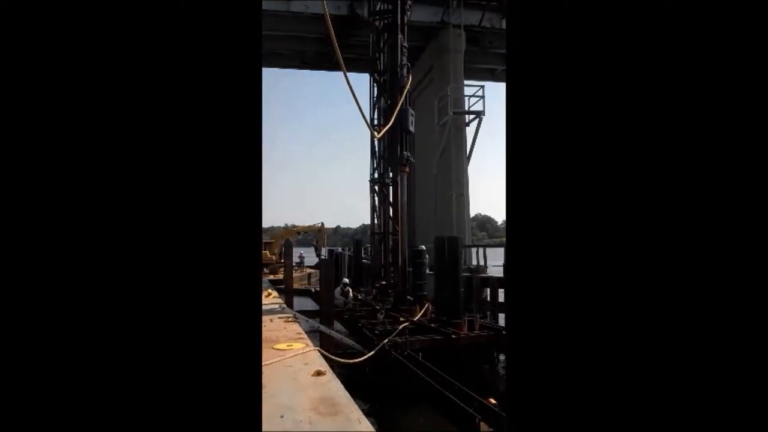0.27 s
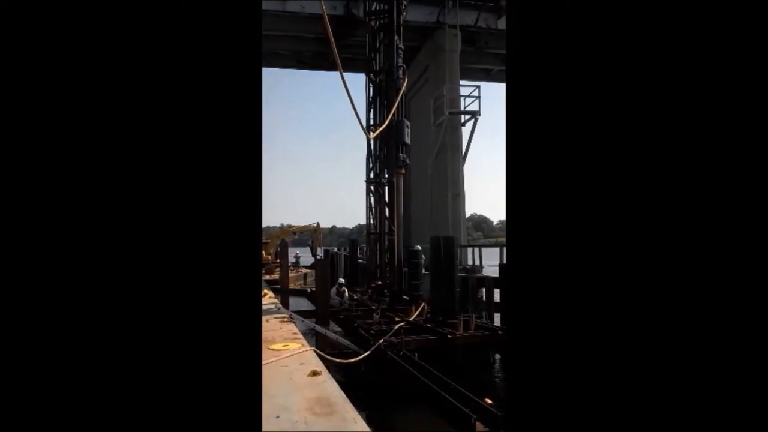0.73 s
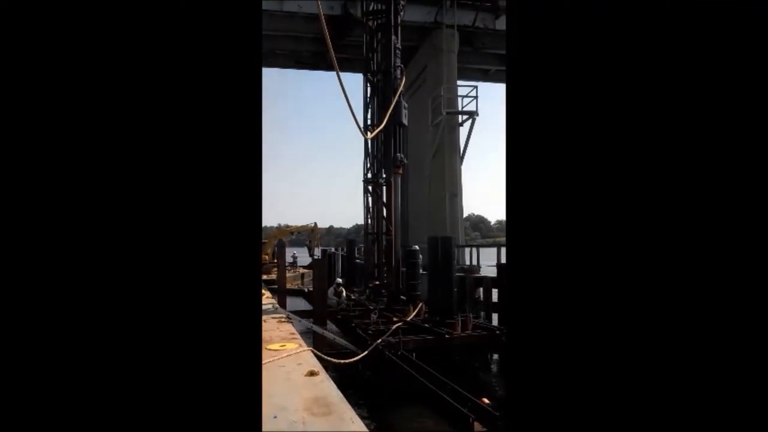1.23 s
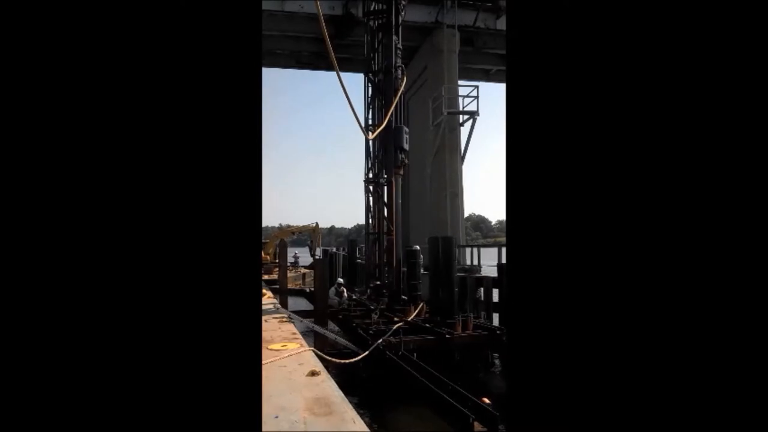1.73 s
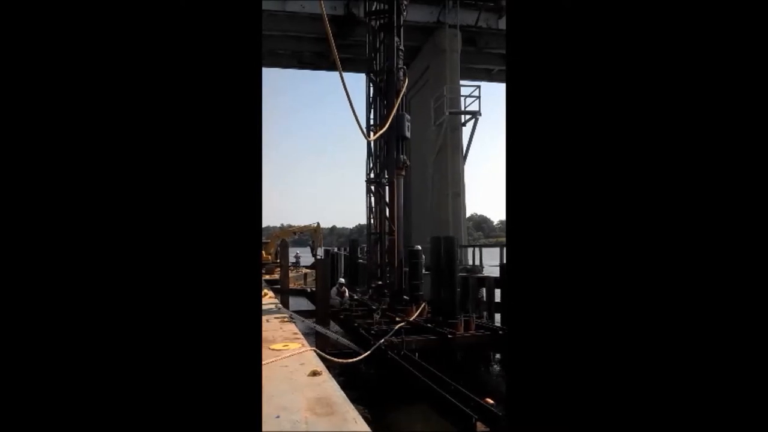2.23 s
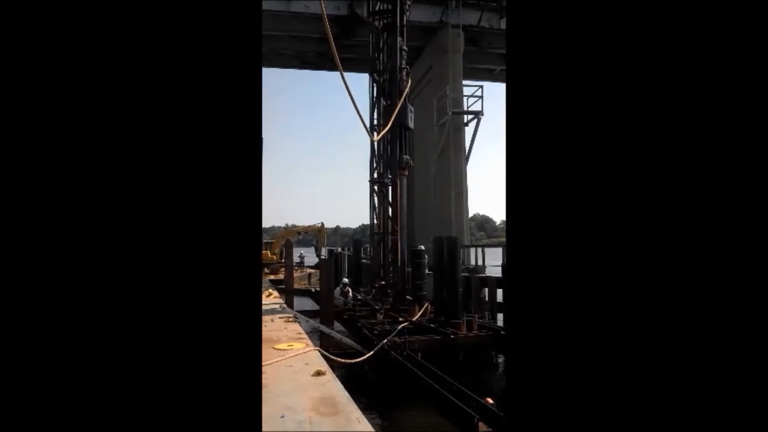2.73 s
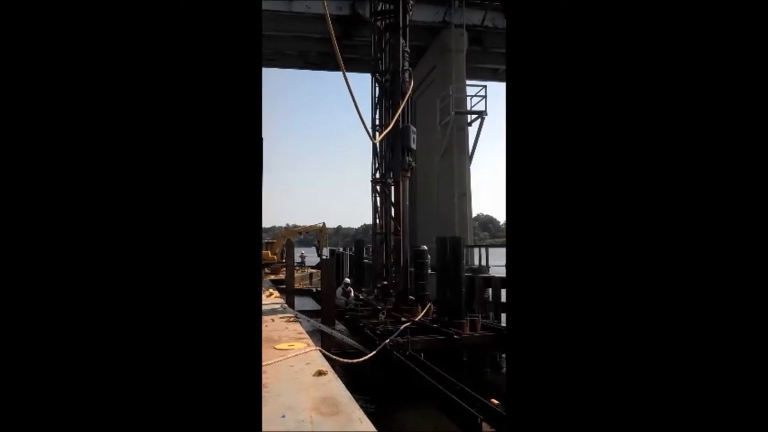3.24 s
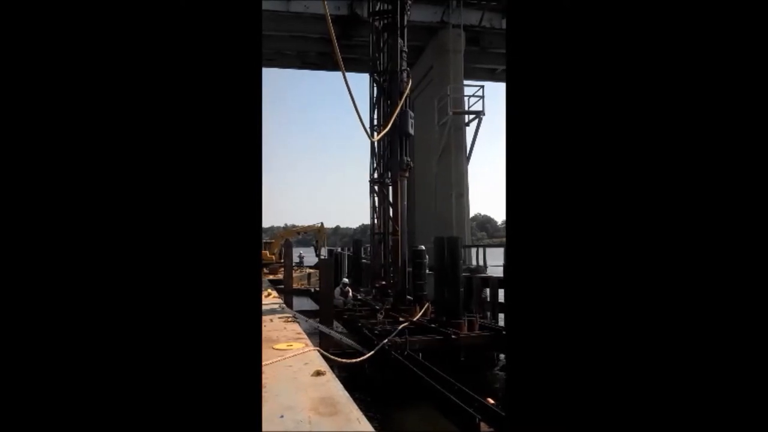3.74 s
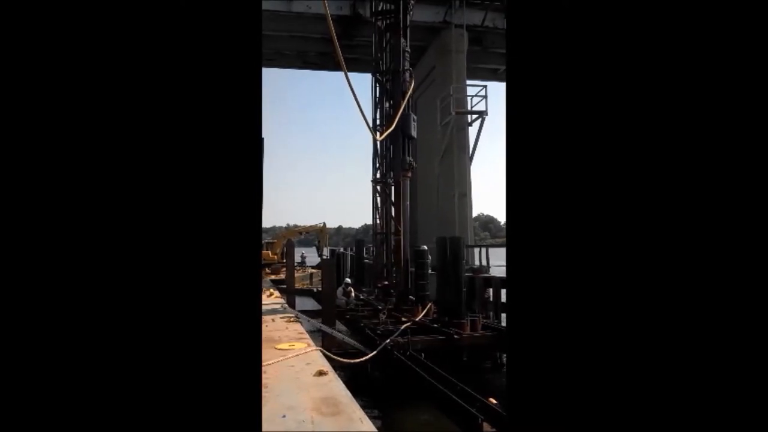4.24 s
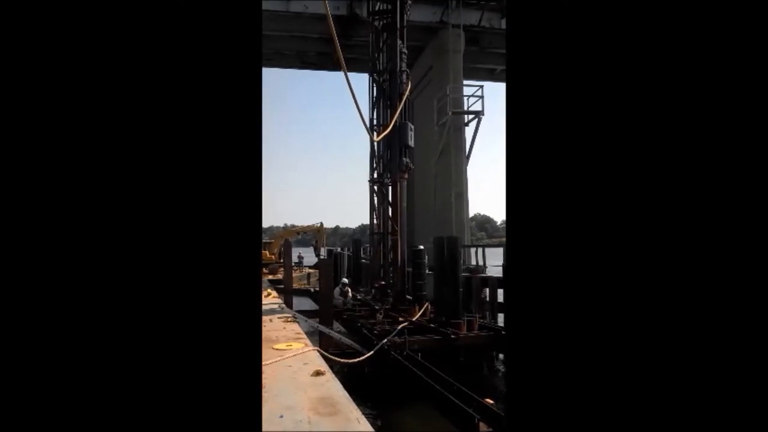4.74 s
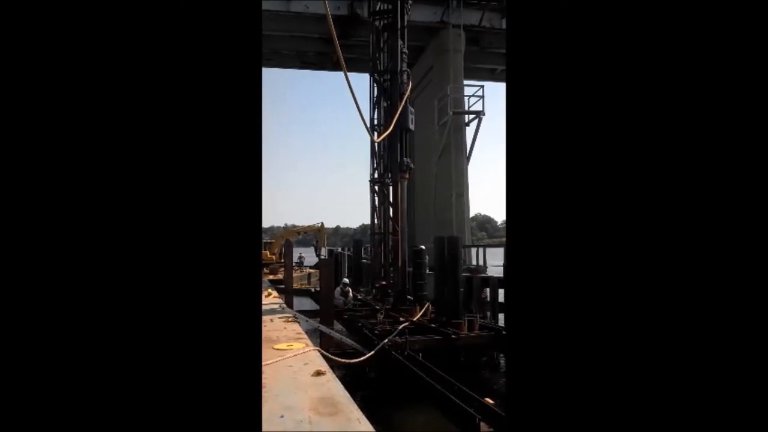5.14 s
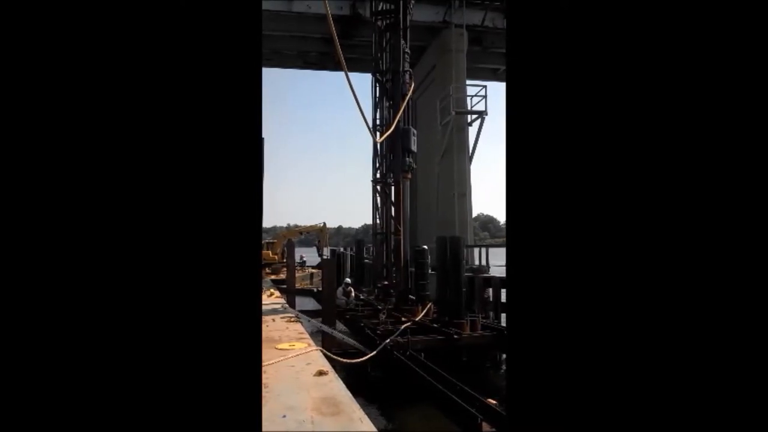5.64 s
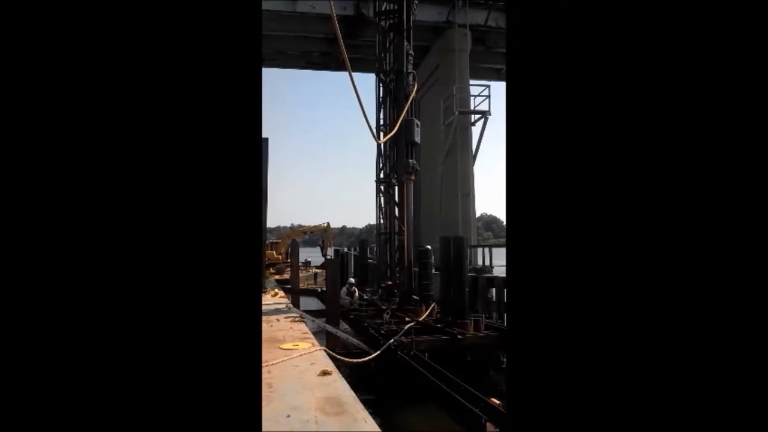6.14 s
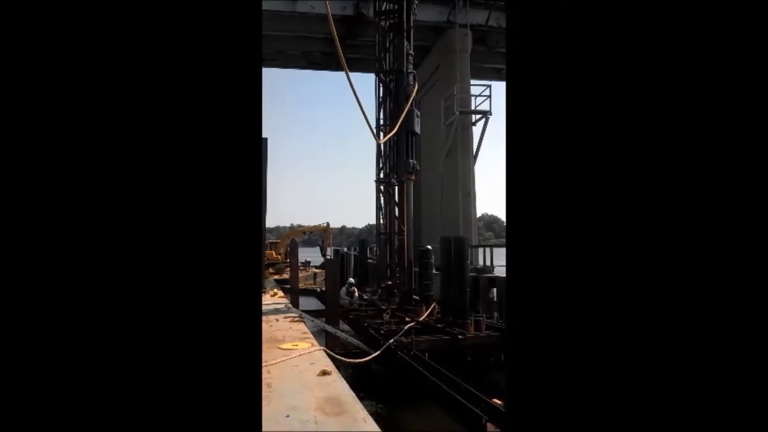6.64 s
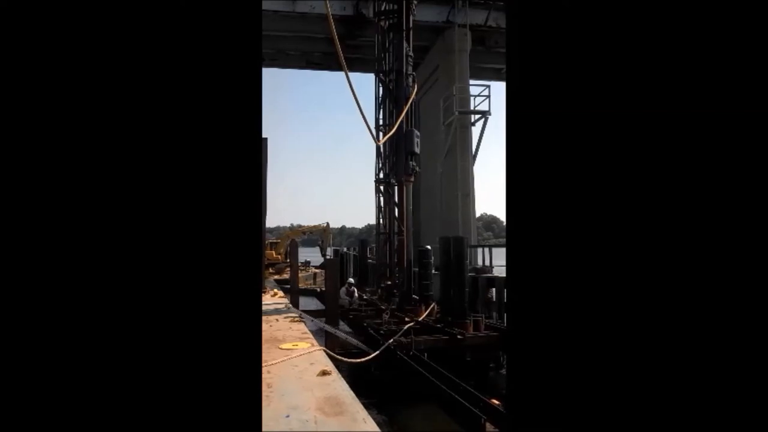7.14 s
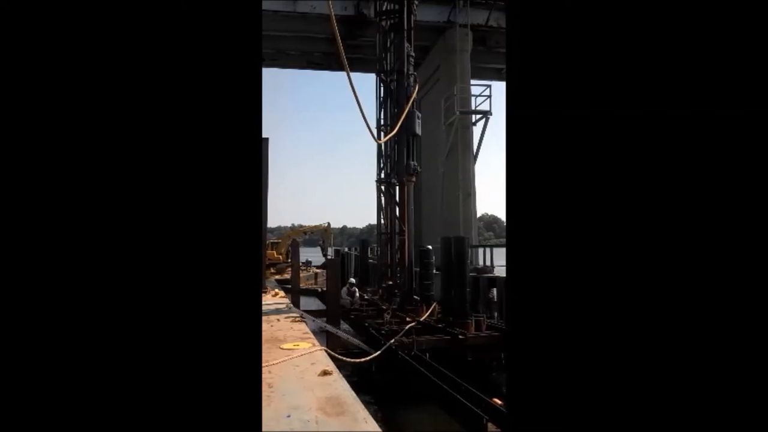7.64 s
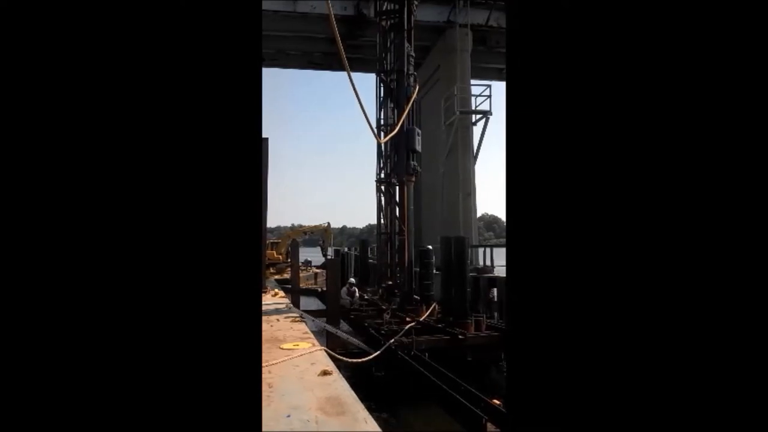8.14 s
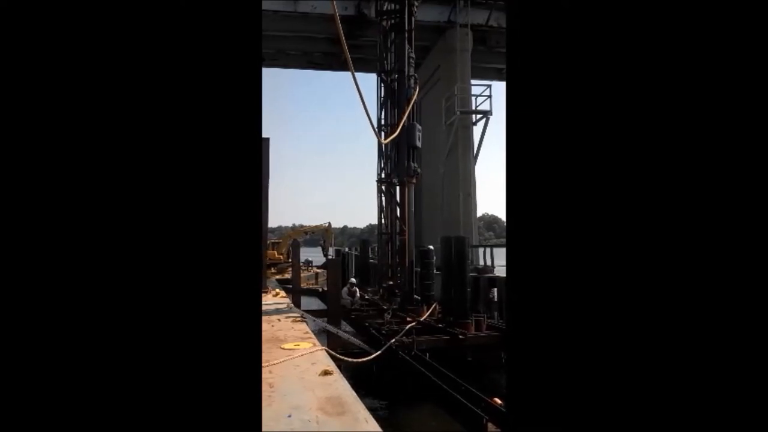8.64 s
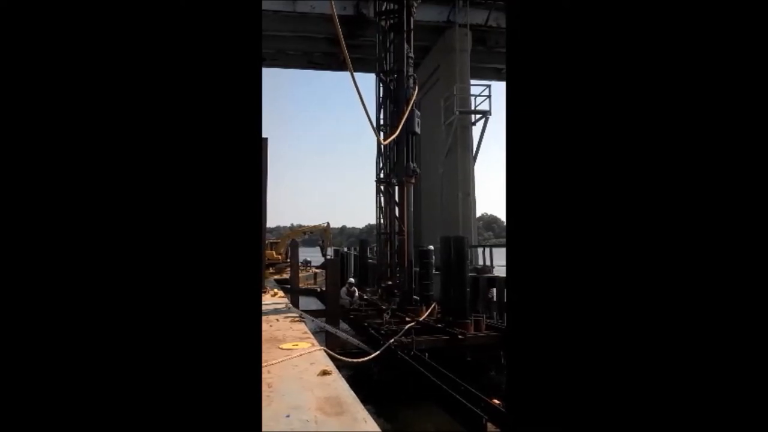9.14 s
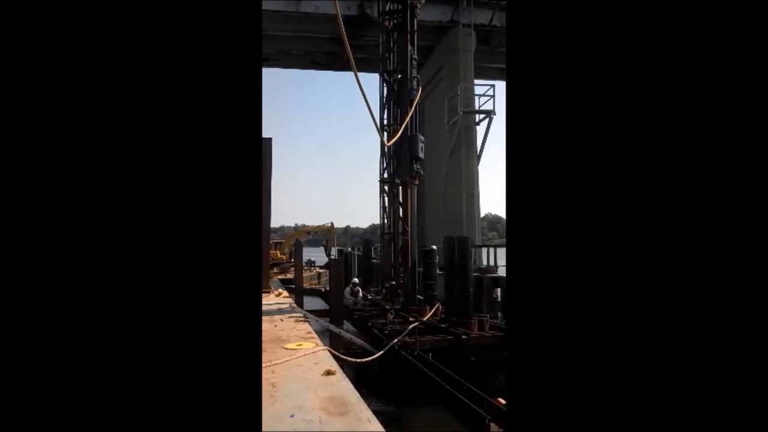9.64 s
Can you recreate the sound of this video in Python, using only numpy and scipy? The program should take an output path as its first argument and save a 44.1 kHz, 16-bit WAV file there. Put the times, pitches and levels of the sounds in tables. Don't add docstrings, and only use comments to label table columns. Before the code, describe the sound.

Steady loud metallic pile-driving blows under a bridge, with clanking steel rebound, sharp bursts of compressed air and a droning compressor behind.

```python
import sys
import numpy as np
from scipy import signal
from scipy.fft import rfft, irfft, next_fast_len
from scipy.io import wavfile
from scipy.ndimage import uniform_filter1d, minimum_filter1d

SR = 44100
rng = np.random.default_rng(int(sys.argv[2]) if len(sys.argv) > 2 else 0)


def persist_wave(psi):
    counts = np.round(np.clip(psi, -1, 1) * 32767).astype(np.int16)
    wavfile.write(sys.argv[1], SR, np.atleast_2d(counts).T)


def makeup_ratio(level_db):
    decades = np.asarray(level_db, float) / 20
    return 10 ** decades


N = 436149
T = np.arange(N) / SR
SIZE = next_fast_len(N + 4096)
HZ = np.arange(SIZE // 2 + 1) * SR / SIZE

# start in seconds, then levels in dB of blow, rebound, low guide bar, high guide bar.
BLOWS = [
    (0.5245, -8.5, 7.5, -2.5, 2),
    (1.8125, -7, 5.5, -7, 0),
    (3.1098, -8.5, 8, 4, 6),
    (4.4919, -7.5, 6, -8.5, 1.5),
    (5.7514, -8.5, 8.5, -2.5, 0),
    (7.0246, -5.5, 5.5, -14, -4),
    (8.3133, -6, 5, -9, -1),
    (9.5938, -6.5, 4.5, -8, -17),
]
# start in seconds, level in dB, rise in seconds, tilt of the low part in dB.
PUFFS = [
    (-0.021, -10.5, 0.025, 4.5),
    (1.272, -10.5, 0.017, 5.5),
    (2.573, -11.5, 0.02, 5),
    (3.985, -11, 0.035, 6.5),
    (5.205, -11, 0.0086, 5.5),
    (6.483, -9.5, 0.014, 5),
    (7.765, -10, 0.024, 7),
    (9.041, -11, 0.034, 5.5),
]
# seconds after the blow, level in dB, width in seconds.
SURGES = [
    (.008, -7.5, 0.0029),
    (.02, -6, .004),
    (.031, -3.5, 0.0045),
    (0.045, 1, 0.0054),
    (.07, -1, 0.005),
    (.083, 4, 0.0078),
    (0.126, -7.5, .01),
]


def read(points, hz, order=1):
    rows = np.transpose(points)
    return np.interp(np.log(hz + 1), np.log(rows[0] + 1), rows[order])


def noise(spectrum):
    a, b = rng.standard_normal((2, 2, len(HZ)))
    x = irfft((a + 1j * b) * makeup_ratio(read(spectrum, HZ)), SIZE)[:, :N]
    return x / x.std()


def white_noise():
    return rng.standard_normal((2, N))


def ringing(x, modes):
    out = np.zeros(x.shape)
    for hz, width, db in modes:
        r = np.exp(-np.pi * width / SR)
        poles = [1, -2 * r * np.cos(2 * np.pi * hz / SR), r * r]
        out += makeup_ratio(db) * np.sqrt(1 - r * r) * signal.lfilter([1, 0, -1], poles, x)
    return out


def bursts(starts, levels_db, rise, hold, t60):
    out = np.zeros(N)
    for s, db, up, flat in np.broadcast(starts, levels_db, rise, hold):
        a = max(int(s * SR), 0)
        b = a + int((up + flat + t60) * SR)
        t = T[a:b] - s
        fall_db = 60 * np.maximum(t - up - flat, 0) / t60
        out[a:b] += np.clip(t / up, 0, 1) ** 2 * makeup_ratio(db - fall_db)
    return out


def lumps(width_s, depth_db):
    width = int(width_s * SR)
    x = uniform_filter1d(uniform_filter1d(rng.standard_normal(N), width), width)
    return makeup_ratio(depth_db * x / x.std())


def hammer():
    s, blow_db, rebound_db, *bars_db = np.transpose(BLOWS)
    contact = s - 0.0015
    white = white_noise()
    body = boom(contact, blow_db, white) * surges(contact) * makeup_ratio(-1.5) + thumps(contact, blow_db)
    rebound = clatter(contact, blow_db + rebound_db, bars_db + [-12], white)
    return valve(s, white) + crack(contact, white) + body + rebound + crackles(contact, rebound_db)


def valve(blows, white):
    # start in seconds, level in dB.
    throws = [(0.4876, 1.5), (1.776, 2), (3.075, 2.5), (4.417, 0.5), (5.7167, 3), (6.992, 0), (8.28, 0.5),
              (9.561, 3.5)]
    # frequency in Hz, density in dB per Hz.
    hiss_colour = [(100, -21), (420, 5), (1200, 9.5), (2000, 6.5), (3500, 2.5), (6000, -15), (10000, -46),
                   (16000, -47)]
    s, db = np.transpose(throws)
    start, lead = s - 0.0015, blows - s
    clack = bursts(start, db - 24.5, 0.0028, 0.0041, 0.028)
    hiss = bursts(start, db - 24, 0.016, lead, 0.77)
    body = ringing(white, [(1940, 98, -10.5), (3180, 990, -11.5), (4300, 270, -14.5)])
    return (noise(hiss_colour) + body) * (clack + hiss) * lumps(0.0033, 0.61)


def crack(contact, white):
    # frequency in Hz, density in dB per Hz.
    crack_colour = [(300, -11), (1200, -13), (2000, -14), (3500, -12), (6000, 1.5), (10000, -23),
                    (16000, -7)]
    # frequency in Hz, width in Hz, level in dB.
    cap_modes = [(3750, 1300, 5), (5350, 250, -4), (6840, 200, 2.5), (8500, 210, -9), (8660, 440, -25)]
    snap = bursts(contact, -18.5, 0.0005, 0.0032, 0.039) + bursts(contact, -25, 0.0005, 0.014, 0.052)
    return noise(crack_colour) * snap * lumps(0.00062, 1.7) + ringing(white * snap, cap_modes) * makeup_ratio(-6)


def boom(contact, blow_db, white):
    # frequency in Hz, density in dB per Hz.
    boom_colour = [(40, -39), (100, -40.5), (160, -7), (260, -2), (420, 11.5), (700, -31), (1200, 4),
                   (2000, -7.5), (3500, -14.5), (6000, -68.5), (16000, -85)]
    # frequency in Hz, width in Hz, level in dB.
    pile_modes = [(151, 45, -10), (234, 17, -7), (265, 23, -2), (322, 34, 1.5), (375, 79, 0.5),
                  (517, 12, -10), (696, 11, -9)]
    push = bursts(contact, blow_db - 5, 0.0021, 0.076, 0.23)
    push += bursts(contact, blow_db - 19, 0.00069, 0.0077, 0.18)
    rough = noise(boom_colour) * push * makeup_ratio(2.5) * lumps(0.003, 2.2)
    return rough + ringing((stress_waves() + 0.51 * white) * push, pile_modes) * makeup_ratio(-5)


def stress_waves():
    round_trip_hz = 134.2
    wander = uniform_filter1d(white_noise(), 300) * np.sqrt(300)
    turns = np.cumsum(round_trip_hz * np.exp(0.35 * wander), 1) / SR
    pushes = np.diff(np.floor(turns), prepend=0) * makeup_ratio(1.7 * white_noise())
    return pushes / pushes.std()


def surges(contact):
    lull_db, settled_s = -8, 0.16
    since = T - contact[np.maximum(np.searchsorted(contact, T) - 1, 0)]
    gain = makeup_ratio(lull_db) + np.clip(since / settled_s, 0, 1) ** 4 * 0.5
    for after, db, width in SURGES:
        gain += makeup_ratio(db) * np.exp(-0.5 * ((since - after) / width) ** 2)
    return gain


def thumps(contact, blow_db):
    # frequency in Hz, width in Hz, level in dB.
    thump_modes = [(267, 65, -2), (336, 49, -4), (407, 51, -2.5), (535, 120, -8.5)]
    thump_db, lead_s = 6, 0.00601
    after, db, _ = np.transpose(SURGES)
    at = ((contact[:, None] + after - lead_s) * SR).astype(int)
    pushes = np.zeros((2, N))
    pushes[:, at] = makeup_ratio(blow_db[:, None] + db + thump_db) * np.array([1, 0.4])[:, None, None]
    return ringing(uniform_filter1d(pushes, size=40), thump_modes) * 10


def clatter(contact, strike_db, bars_db, white):
    # frequency in Hz, density in dB per Hz.
    clatter_colour = [(40, -20), (100, -65), (260, 0.5), (700, 0), (1200, -5.5), (2000, -8.5), (3500, -18),
                      (6000, -22.5), (10000, -43.5), (16000, -36)]
    # frequency in Hz, width in Hz, level in dB.
    guide_modes = [(1436, 41, -0.5), (2870, 67, -4.5), (3680, 50, -6), (4900, 26, -9.5), (5680, 28, -6),
                   (8500, 40, -42), (10600, 41, -13)]
    # frequency in Hz, width in Hz, level in dB.
    bar_modes = [(2056, 45, 3), (4085, 75, -8), (5318, 30, -14)]
    rattle = lumps(0.00085, 2.17) * lumps(0.0052, 1.06)
    strike = bursts(contact + 0.026, strike_db - 5, 0.041, 0.026, 0.44)
    strike += bursts(contact + 0.049, strike_db - 9, 0.0034, 0.028, 0.22)
    shaken = white[::-1] * rattle
    out = noise(clatter_colour) * rattle * strike
    out += ringing(shaken * bursts(contact + 0.05, strike_db - 16, 0.006, 0.015, 0.31), guide_modes)
    blow_db = np.transpose(BLOWS)[1]
    for bar, db in zip(bar_modes, bars_db):
        shake = bursts(contact + 0.037, blow_db + db - 10.5, 0.012, 0.058, 0.48)
        out += ringing(shaken * lumps(0.023, 3.7) * shake, [bar])
    return out


def crackles(contact, rebound_db):
    snaps_per_s = 500
    level = bursts(contact + 0.045, rebound_db - 27, 0.024, 0.019, 0.32)
    strength = makeup_ratio(3.5 * np.minimum(rng.exponential(1, N), 3))
    clicks = (rng.random(N) < snaps_per_s / SR) * strength * white_noise()
    parts = [(1940, 1000, 2), (4100, 350, -4.5), (6750, 400, -9.5), (13000, 1900, -9)]
    return ringing(clicks / clicks.std() * level, parts)


def exhaust():
    # frequency in Hz, density in dB per Hz.
    puff_colour = [(100, -31), (260, -11), (420, -10), (700, -5.5), (1200, -4.5), (2000, 1.5), (3500, -2),
                   (6000, -5), (7500, -7.5), (10000, -17.5), (16000, -16.5)]
    s, db, rise, low_db = np.array(PUFFS).T
    leak = bursts(s - 0.04, db - 20.5, 0.023, 0.078, 0.23)
    flow = bursts(s - 0.016, db, rise + 0.0013, 0.023, 0.53) + leak
    white = white_noise()
    port = ringing(white, [(1250, 480, -9.5), (2660, 940, -23), (3850, 810, -20.5), (5500, 250, -34)])
    hiss = (noise(puff_colour) + port) * flow * lumps(0.00042, 1.1) * lumps(0.024, 1.9)
    chuff = bursts(s - 0.012, db + low_db - 15.5, rise, 0.059, 0.29)
    return hiss + ringing(white[::-1] * chuff, [(663, 400, -0.5), (340, 80, -27)])


def ticks():
    # start in seconds, level in dB, pitch in Hz.
    pings = [
        (3.393, -27, 2100),
        (3.42, -24, 1980),
        (3.489, -28, 2070),
        (7.178, -26, 10570),
        (8.998, -32, 2000),
        (9.82, -60.5, 4020),
    ]
    out, t = np.zeros(N + 2000), T[:2000]
    for s, db, hz in pings:
        a = int(s * SR)
        out[a:a + 2000] += makeup_ratio(db + 5 - 60 * t / 0.053) * np.sin(2 * np.pi * hz * t)
    return out[:N]


def knocks():
    # start in seconds, level in dB, length in seconds.
    bumps = [
        (5.664, -43, 0.011),
        (5.69, -48, .015),
        (8.637, -41, 0.023),
        (9.739, -18, 0.025),
        (9.792, -24, 0.036),
        (9.842, -43, 0.017),
        (9.882, -21, .01),
    ]
    s, db, length = np.transpose(bumps)
    push = bursts(s, db, 0.0079, length, 0.16)
    return ringing(white_noise() * push, [(340, 65, -16), (517, 62, 5.5)])


def bridge(x):
    # frequency in Hz, decay time t60 in seconds.
    decay = [(60, 1.37), (250, 0.81), (500, 1.75), (1500, 1.06), (3500, 0.94), (7000, 0.67), (15000, 0.13)]
    hz, t, z = signal.stft(rng.standard_normal((2, SR)), SR, nperseg=256)
    fading = z * makeup_ratio(-60 * t / read(decay, hz)[:, None])
    tail = signal.istft(fading, SR, nperseg=256)[1][:, :SR]
    tail = tail * np.clip(T[:SR] / 0.006, 0, 1)
    return signal.fftconvolve(x, tail / np.linalg.norm(tail[0]), axes=1)[:, :N]


def compressor():
    # frequency in Hz, density in dB per Hz.
    drone_colour = [(30, -34), (60, -18), (100, 4.5), (260, -8.5), (420, -39), (700, 1), (1200, -3.5),
                    (2000, -10), (3500, -12.5), (6000, -14.5), (10000, -29.5), (16000, -20)]
    # frequency in Hz, width in Hz, level in dB.
    firing_modes = [(212.4, 18, -2.5), (260, 53, 0), (336, 32, -4.5), (398, 29, 0.5), (602, 3.4, -19),
                    (799.6, 29, -2)]
    # frequency in Hz, width in Hz, level in dB.
    whistle_modes = [(4610, 70, -2), (8000, 35, -12)]
    # time in seconds, level in dB.
    engine_load = [(0, -43), (1.3, -44), (2.4, -44.5), (3.6, -43.5), (4.9, -43), (6.1, -44.5), (7.5, -41),
                   (8.8, -42.5), (9.89, -47)]
    blows = np.transpose(BLOWS)[0]
    puffs = np.append(np.transpose(PUFFS)[0][1:], T[-1] + 1)
    labour = bursts(blows + 0.046, 11.5, 0.096, 0, 0.4)
    load = makeup_ratio(np.interp(T, *np.transpose(engine_load))) * (1 + labour)
    lift_after, lift_rise, idle_db = 0.14, 0.26, -57
    until_exhaust = puffs - blows - lift_after - lift_rise
    lift = bursts(blows + lift_after, -49, lift_rise, until_exhaust, 0.5)
    white = white_noise()
    firing = ringing(white, firing_modes) + ringing(white, [(482, 148, 2.7)])
    firing = firing * load * lumps(0.017, 1.61) * lumps(0.12, 1.5)
    whistle = ringing(white, whistle_modes) * (lift + makeup_ratio(idle_db)) * lumps(0.069, 1.1)
    return makeup_ratio(-32) * noise(drone_colour) * lumps(0.015, 0.39) * lumps(0.067, 0.41) + firing + whistle


def scene():
    blows, puffs = hammer() + ticks() + knocks(), exhaust()
    return blows + puffs + bridge(makeup_ratio(-14) * blows + makeup_ratio(-10) * puffs) + compressor()


def widen(z):
    # frequency in Hz, right over left in dB, left-right likeness from 0 to 1.
    balance = [(31, 15, 0.58), (72.5, -9, 1), (127.5, 5.5, 0.83), (220, 4.5, 0.67), (316, 7.5, 0.52),
               (428, 2, 0.98), (694, 2, 0.65), (16000, -1.5, 1)]
    # frequency in Hz, sum-difference likeness from 0 to 1, squeeze exponent of the weaker one.
    notches = [(50, 0.63, 0), (120, 1, 0), (3020, 1, 0.29), (7400, 0.71, 0.15), (9800, .25, 0),
               (16000, .12, 0.51)]
    # frequency in Hz, extra lead of the right side in radians.
    bass_lead = [(70, 0), (123, 1.8), (204, 2.5), (285, 3.5), (339, 5.6), (380, 6.4), (753, 7.5),
                 (1400, 6.283)]
    lead_samples = 16
    right_db, same = read(balance, HZ), np.clip(read(balance, HZ, order=2), 0, 1)
    like, squeeze = np.clip(read(notches, HZ), 0, 1), read(notches, HZ, order=2)
    extra = read(bass_lead, HZ)
    turn = -np.exp(1j * (2 * np.pi * HZ * lead_samples / SR + extra))
    blend = same * z + np.sqrt(1 - same ** 2) * z[::-1] * [[1], [-1]]
    right = makeup_ratio(right_db) * turn * blend
    mid, side = (z + right) / 2, (z - right) / 2
    side = like * side[0] + np.sqrt(1 - like ** 2) * side[1]
    ratio = (abs(1 + turn) + 1e-3) / (abs(1 - turn) + 1e-3)
    mid = mid[0] * np.minimum(ratio, 1) ** squeeze
    side = side * np.minimum(1 / ratio, 1) ** squeeze
    return np.array([mid + side, mid - side]) * np.exp(-1j * extra)


def roll_off(x):
    return signal.sosfilt(signal.butter(12, 17060, fs=SR, output="sos"), x)


def record(dry):
    power_db = 10 * np.log10(uniform_filter1d((dry ** 2).mean(0), 1500) + 1e-12)
    fall = T * 25.2
    held_db = np.maximum.accumulate(power_db + fall) - fall
    over_db = np.maximum(held_db + 39, 0)
    ducked = dry / makeup_ratio(0.36 * uniform_filter1d(over_db, 1500) + 0.5)
    cut = signal.sosfilt(signal.butter(2, 75, "high", fs=SR, output="sos"), ducked)
    edge_hz, ceiling = 15750, 0.93
    z = rfft(cut, SIZE) * makeup_ratio(-50 * np.clip((HZ - edge_hz) / 200, 0, 1))
    stereo = irfft(widen(z), SIZE)[:, :N]
    room = minimum_filter1d(ceiling / np.maximum(abs(stereo).max(0), ceiling), size=401)
    return roll_off(stereo * uniform_filter1d(room, size=201))


dry = scene()
out = record(dry)
persist_wave(out)
```